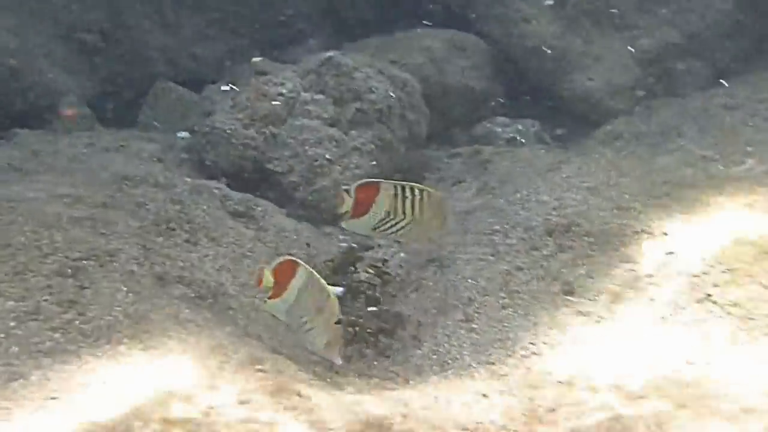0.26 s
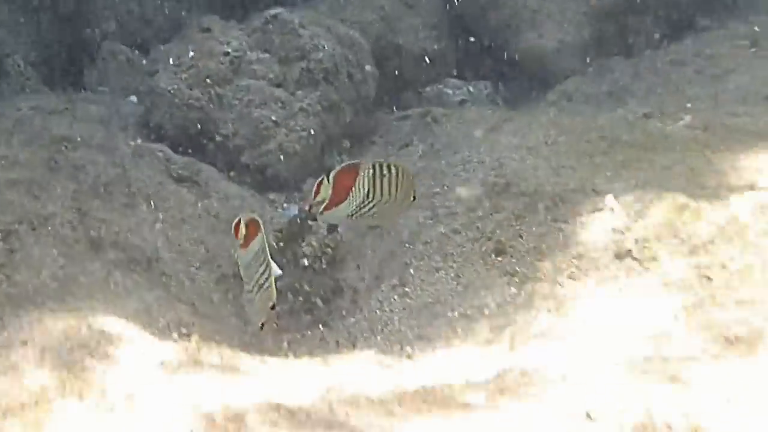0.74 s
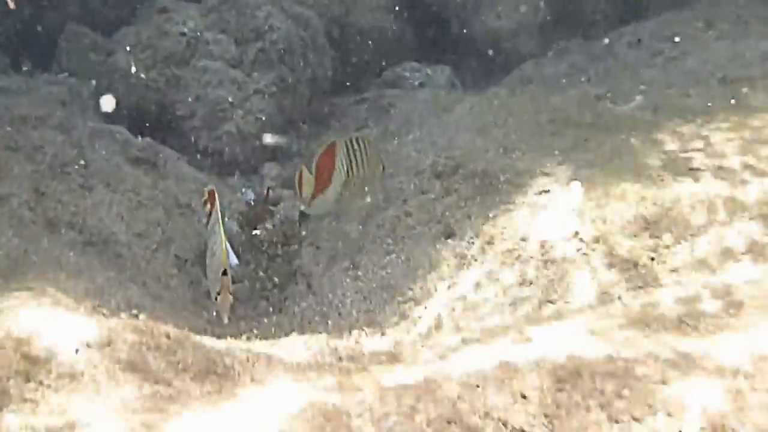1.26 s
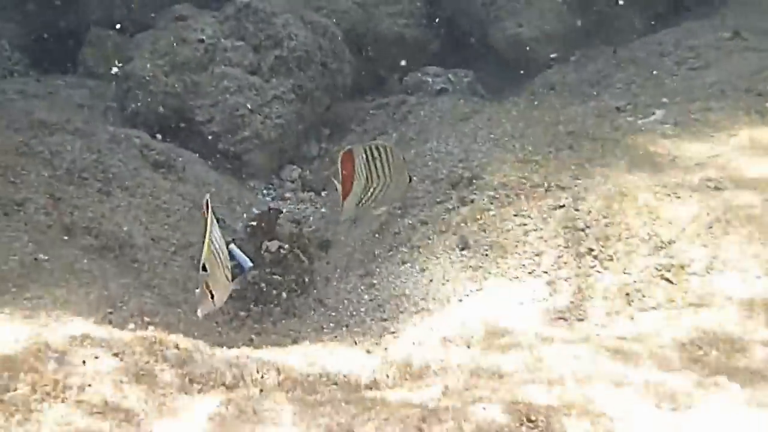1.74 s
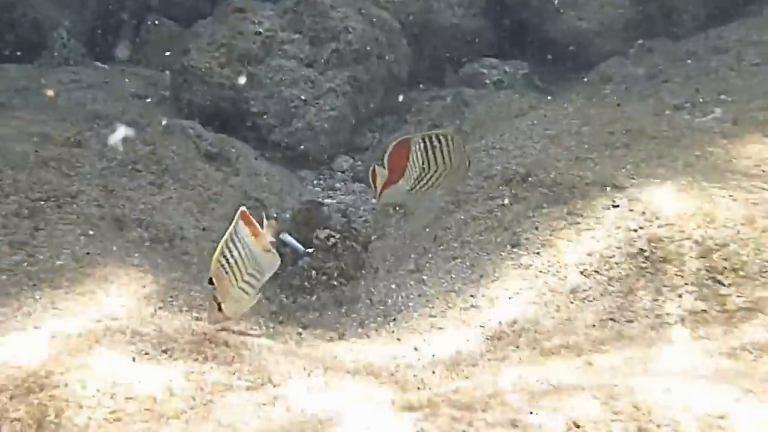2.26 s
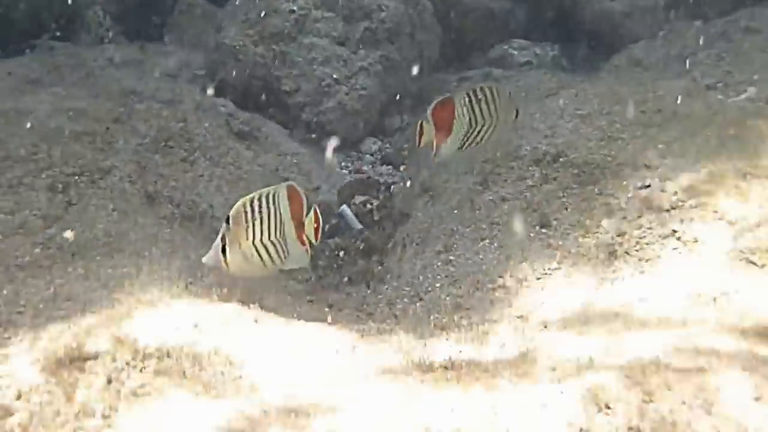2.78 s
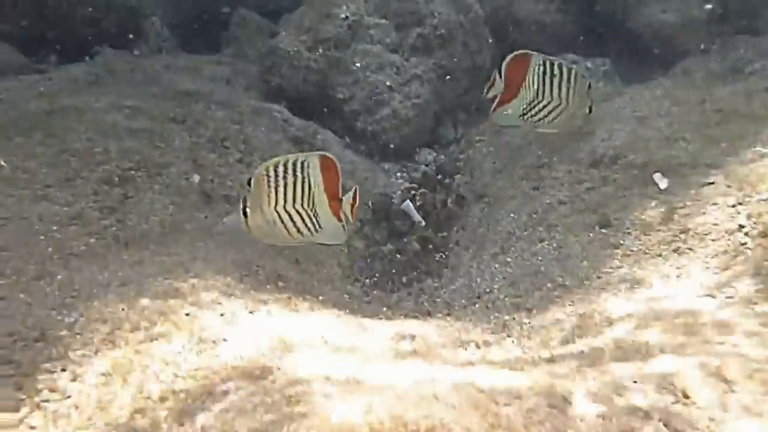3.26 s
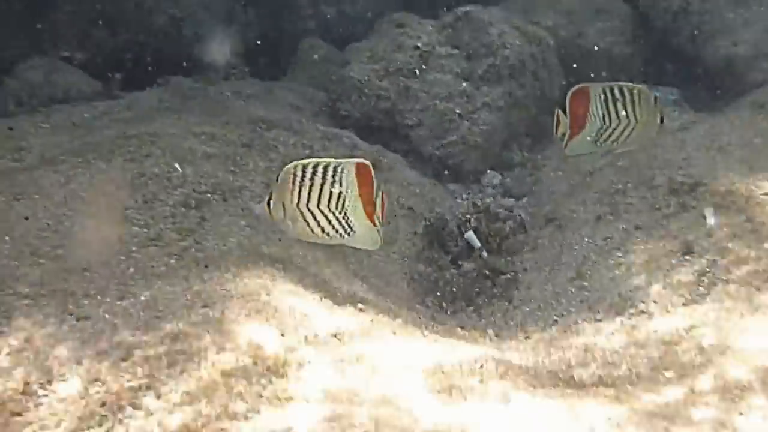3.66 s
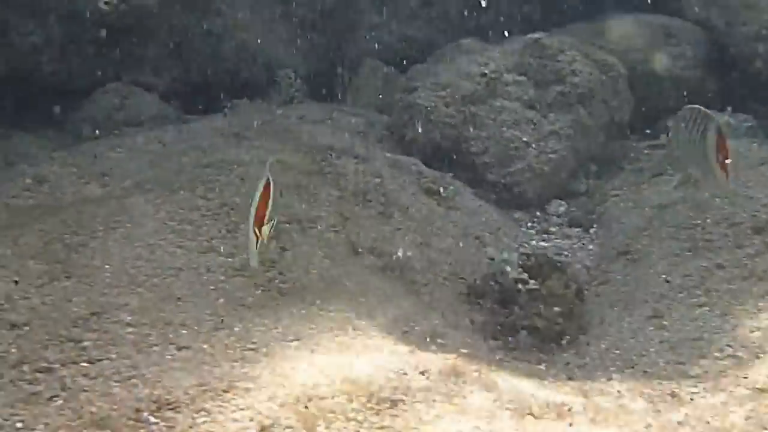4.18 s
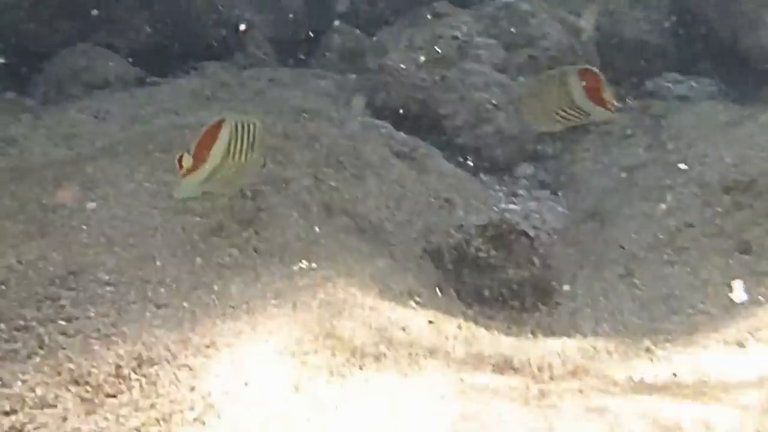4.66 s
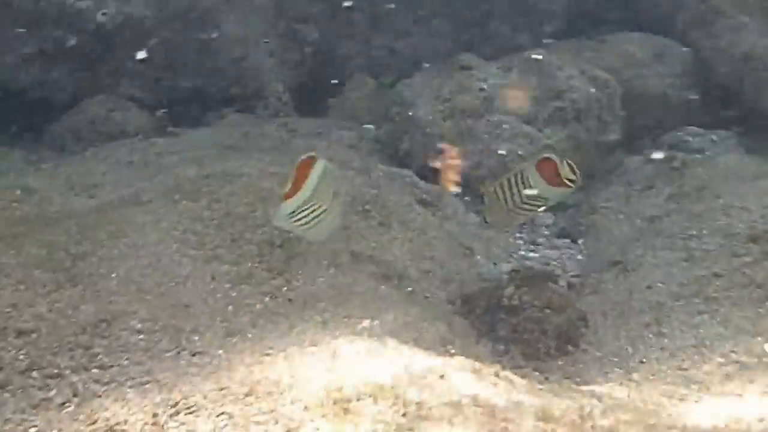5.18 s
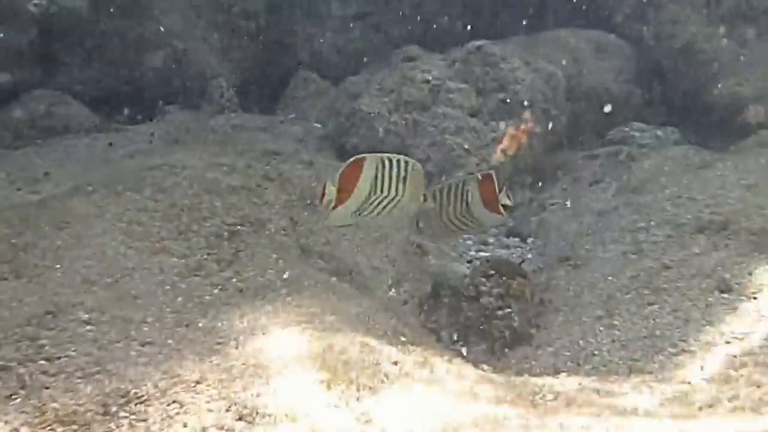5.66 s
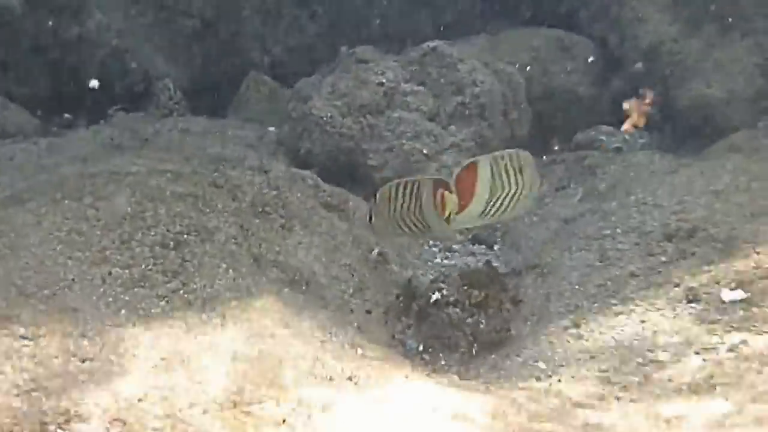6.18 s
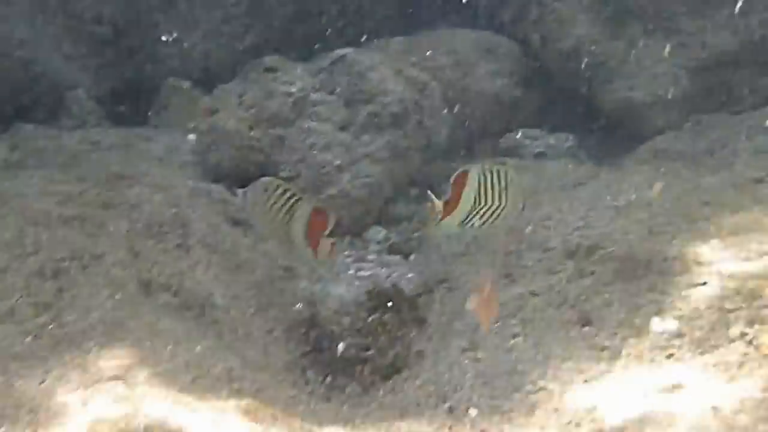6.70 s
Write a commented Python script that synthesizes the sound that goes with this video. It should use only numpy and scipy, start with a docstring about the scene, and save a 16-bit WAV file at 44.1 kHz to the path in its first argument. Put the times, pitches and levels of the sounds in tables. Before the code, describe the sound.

Heard underwater in the rocky shallows, a fine, steady crackle of bubbles and snapping animals surrounds a housed microphone. Bright pops and ticks land irregularly close by, while soft low thuds of water bump the housing. Small wavelets briefly thicken the crackle. Around three and a half seconds a breaking wavelet sends down a louder bubble rush that sinks in pitch, then the crackling continues over low gurgling wash and faint hiss.

```python
"""Under shallow water over rocks

The microphone sits in a camera housing held under water. Tiny bubbles and snapping animals crackle
all round, a few of them close by: ringing grains and noise bursts, each with short echoes.
A wavelet breaks overhead and its bubble cloud sinks in pitch, as a swarm with a moving lower edge.
Water slops against the housing in short, soft pressure pulses, over filtered-noise wash and hiss."""
import sys
import numpy as np
from scipy import signal
from scipy.fft import rfft, irfft
from scipy.io import wavfile
from scipy.ndimage import uniform_filter1d

SR = 44100
rng = np.random.default_rng(int(sys.argv[2]) if len(sys.argv) > 2 else 0)


def materialize(psi):
    """Save the field psi as 16-bit PCM at rate SR to the path in sys.argv[1].

    A 1-D psi becomes a single channel; in a 2-D psi each row is a channel.
    """
    bounded = np.clip(np.atleast_2d(psi).T, -1, 1)
    quanta = np.round(bounded * 32767).astype(np.int16)
    wavfile.write(sys.argv[1], SR, quanta)


N = 306054
TIME = np.arange(N) / SR

# Spectrum of the bubble crackle; shallow water carries little below about 1.5 kHz: pitch_hz, level_db
CLOUD_COLOUR = [(900, -28.5), (1350, -14), (1520, -8), (1640, -6.5), (1800, -3.5), (2000, 3), (2250, -2),
                (2700, 0.5), (3450, -1), (3850, -4), (4300, -14.5), (4900, -29), (7000, -58.5)]
# Steady crackle between wavelets: start_s, level_db
CRACKLE = [(0, -33), (1.1, -30.5), (1.37, -34.5), (1.5, -31), (2.45, -32.5), (3.05, -33), (3.25, -32),
           (4.1, -36.5), (4.42, -29.5), (4.65, -31.5), (5.0, -29), (5.35, -35), (5.85, -30.5),
           (6.15, -35.5), (6.4, -31), (6.94, -32.5)]
# Small wavelets that spill bubbles: start_s, length_s, level_db, pitch_hz at mid-length
WAVELETS = [(-.05, 0.43, -27, 2710), (0.836, 0.21, -32.5, 3380), (1.748, 0.38, -28, 2380),
            (6.434, 0.49, -30.5, 2140)]


def cloud(calm_hz=2870, sink_octaves=0.97, favour_db=5, favour_octaves=0.28, far_db=-7):
    """Near crackle over a distant blur; wavelets make it louder and pull the prevailing bubble pitch along."""
    crackle = swarm(1423, 4945, per_s=900, spread_db=4.5, ring_s=0.00066)
    blur = coloured(rng.standard_normal(N), [(600, -39), (1200, 6.0), (5000, 1.0), (8000, -16)])
    calm = gain_of(follow(CRACKLE, TIME)) * wavering(depth_db=-1, per_s=11)
    spills = [swell(s, length, db, crest=0.25) for s, length, db, _ in WAVELETS]
    level = surging(calm, spills)

    # the prevailing pitch is an average weighted by power
    weighted_hz = calm ** 2 * calm_hz * wavering(depth_db=-0.63, per_s=9)
    for spill, (s, length, _, hz) in zip(spills, WAVELETS):
        weighted_hz = weighted_hz + spill ** 2 * sinking(s, length, hz, sink_octaves)
    prevailing_hz = weighted_hz / level ** 2

    def field_db(hz, t):
        away = np.log2(hz / np.interp(t, TIME, prevailing_hz)) / favour_octaves
        return read(CLOUD_COLOUR, hz) + favour_db * np.exp(-away ** 2 / 2)

    return shaped(crackle + gain_of(far_db) * blur, field_db, patchy_db=2.54) * level


# The wavelet breaking overhead: start_s, level_db before a small trim, pitch_hz of the lower edge
BREAKER = [(3.31, -68, 3670), (3.371, -30, 3760), (3.6, -27, 2570), (3.73, -20.5, 2070), (3.86, -19, 1760),
           (4.001, -20.5, 1810), (4.07, -30.5, 1680), (4.24, -27.5, 1500), (4.359, -39, 1620)]
# Spectrum of its bubbles before the moving edge: pitch_hz, level_db
BREAKER_COLOUR = [(1000, -22), (1500, -0.5), (2700, 5.5), (3200, 0.5), (3800, -3.5), (4400, -23),
                  (5200, -31), (7000, -27)]


def breaker(below_db=85, above_db=4, trim_db=0.6, large_db=3, large_spread_db=3, large_ring_s=0.0021, count=36):
    """Mostly ever larger bubbles are trapped, so the rush's lower edge sinks; some large ones ring out singly."""
    rush = swarm(1354, 5330, per_s=2000, spread_db=3.5, ring_s=0.00071, count=30)

    def field_db(hz, t):
        octave = np.log2(hz / follow(BREAKER, t, axis=2))
        # steep slope (dB per octave) below the edge, gentle slope above
        slope_db = below_db * np.minimum(octave, 0) - above_db * np.maximum(octave, 0)
        return read(BREAKER_COLOUR, hz) + slope_db

    start, end = BREAKER[0][0], BREAKER[-1][0]
    out = shaped(rush, field_db, patchy_db=1.0) * gain_of(follow(BREAKER, TIME) + trim_db)
    out *= (TIME > start) & (TIME < end)
    for u, v, w in rng.random((count, 3)):
        s = start + u * (end - start)
        edge_hz = follow(BREAKER, s, axis=2)
        # single pitches lie between the edge and 3 kHz, all slightly lowered
        hz = edge_hz * (3000 / edge_hz) ** w * 0.96
        grain = peaked(scattered(bubble(hz, large_ring_s), echo_db=-8, decay_s=.005))
        db = follow(BREAKER, s) + large_db + large_spread_db * (2 * v - 3.5)
        add(out, s, gain_of(db) * grain)
    return out


# Pops close to the microphone: start_s, level_db, pitch_hz, ring_s, echo_db
POPS = [(0.0064, -11.5, 3320, 0.001, -1), (0.0877, -1.5, 2570, 0.0015, -11), (0.1396, -10, 2730, 0.0015, 0),
        (0.1598, -13, 2730, 0.002, -7), (0.1766, -21, 2370, 0.0015, -2), (0.2757, -11, 2675, 0.0028, -7),
        (0.339, -13, 2700, 0.002, -10), (0.536, -14, 3130, 0.0005, 7), (0.6492, -11.5, 2400, 0.00054, -5),
        (0.8714, -10, 3520, 0.0012, -3.5), (0.88, -21, 2680, 0.0023, -4), (0.9213, -20, 2650, 0.00084, -7),
        (1.0081, -6.5, 3420, 0.00065, -9), (1.6086, -13, 3310, 0.0014, -15),
        (1.728, -8.5, 3360, 0.003, -13), (1.794, -10, 3466, 0.0018, -1), (1.8126, -16.5, 2110, 0.0021, -15),
        (1.8902, -13, 2650, 0.0013, 0), (1.9081, -18, 2540, 0.0021, -9), (2.0638, -16, 1806, 0.0023, 0),
        (2.1137, -17, 1950, 0.0013, -8), (2.354, -15, 3120, 0.0016, -7), (2.5733, -4.5, 3270, 0.0014, -3),
        (2.782, -10, 3350, 0.0015, -5), (2.7932, -13.5, 1980, 0.00085, 0.5), (2.8, -8.5, 3420, 0.00091, -2),
        (2.9722, -14.5, 3250, 0.001, -2), (3.0552, -14, 3550, 0.0017, -9),
        (3.1596, -13, 2740, 0.0019, -3.5), (3.2253, -15.5, 3010, 0.0017, -6),
        (3.3055, -19.5, 2220, 0.0018, 4), (3.4513, -11, 3500, 0.0022, -11), (3.506, -13, 3120, 0.0015, -7),
        (3.5513, -6.5, 3450, 0.0015, -11), (3.6927, -8.5, 2380, 0.0013, -9), (3.706, -12, 2570, 0.0015, -7),
        (3.8507, -3.5, 2160, 0.00074, -6), (3.8584, -11.5, 2180, 0.00094, 4),
        (3.9813, -4.5, 2700, 0.0016, -9), (4.0018, -4, 1980, 0.0023, -15), (4.119, -9.5, 1620, 0.0015, 2),
        (4.1243, -6, 2670, 0.0027, -24), (4.1871, -6.5, 1730, 0.0021, -5),
        (4.2066, -5.5, 2800, 0.00083, -11), (4.225, -7.5, 3280, 0.0005, 0), (4.2967, -12, 2600, 0.0028, -6),
        (4.311, -12, 2730, 0.0015, -7), (4.7203, -15.5, 2670, 0.0011, -16),
        (4.7654, -10, 3200, 0.00077, -7.5), (4.8299, -15, 3290, 0.0015, -7),
        (4.9512, -15.5, 2110, 0.0027, -12), (5.0073, -13.5, 2730, 0.0026, -19),
        (5.036, -9, 3060, 0.00097, -11), (5.106, -17.5, 3020, 0.0026, -9), (5.1788, -15, 3490, 0.0015, -2),
        (5.2849, -13, 3420, 0.0011, -0.5), (5.461, -10, 2800, 0.0005, 12), (5.4815, -9, 3420, 0.0008, 1.5),
        (5.6074, -7.5, 3350, 0.00074, 0), (5.6986, -7.5, 3540, 0.0022, -14), (5.7099, -6, 3260, 0.0015, -8),
        (5.9257, -9.5, 2760, 0.0016, -7), (5.9434, -17, 2640, 0.0015, -11), (5.9896, -6, 3270, 0.0018, -10),
        (6.028, -12, 2570, 0.0022, -12), (6.039, -8.5, 3010, 0.0033, -3.5), (6.0445, -15, 2940, 0.0023, 0),
        (6.144, -14.5, 2370, 0.0022, -7), (6.2098, -13, 3010, 0.0017, -10), (6.3897, -14, 2780, 0.0013, -9),
        (6.4318, -17, 2530, 0.0023, -3), (6.4848, -14, 1980, 0.0013, -6), (6.5163, -6.5, 2100, 0.0013, 1),
        (6.5397, -14, 2600, 0.0013, -11), (6.6792, -11, 2600, 0.002, -10), (6.858, -11, 2800, 0.0016, -22)]


def pops(crack_db=-5.0, crack_share=1.96, crack_rise_s=0.000068, tick_db=-24, tick_decay_s=0.00046,
         faint_db=-23, faint_spread_db=6, count=30):
    """A close pop is a bright tick, a crack and a brief ring with echoes; fainter ones fall at random."""
    out, t = np.zeros(N), span(size=1024)
    faint = [(u * TIME[-1], faint_db + faint_spread_db * v, 2100 + 1450 * w, .0016, -7)
             for u, v, w in rng.random((count, 3))]
    for s, db, hz, ring_s, echo_db in list(POPS) + faint:
        burst = (1 - np.exp(-t / crack_rise_s)) * np.exp(-t / (crack_share * ring_s))
        crack = peaked(coloured(rng.standard_normal(len(t)), CLOUD_COLOUR) * burst)
        pop = bubble(hz, ring_s, glide=1.2) + gain_of(crack_db) * crack
        pop = scattered(pop, echo_db=echo_db, decay_s=0.0056)
        # large, low bubbles are duller
        pop = softened(pop, low_hz=1590, high_hz=min(4300, 1.59 * hz))
        tick = rng.standard_normal(len(t)) * np.exp(-t / tick_decay_s)
        tick = peaked(softened(tick, low_hz=3330, high_hz=7250))
        add(out, s, gain_of(db) * peaked(pop))
        add(out, s, gain_of(db + tick_db) * tick)
    return out


# Dry, wide-band snaps of shrimp: start_s, level_db relative to one another
SNAPS = [(0.085, -19), (2.2281, 0.5), (2.5726, -16), (4.6018, -3), (5.7244, -6)]


def snaps(decay_s=.0003, echo_db=-8):
    """A snapping claw gives one sharp spike that reaches far into the treble, then a duller echo."""
    out, t = np.zeros(N), span(size=256)
    for s, db in SNAPS:
        spike = evened(rng.standard_normal(len(t)) * np.exp(-t / decay_s))
        echo = softened(scattered(spike, echo_db=-1, decay_s=0.0047), low_hz=1800, high_hz=6000)
        add(out, s, gain_of(db) * spike)
        add(out, s + .003, gain_of(db + echo_db) * echo)
    colour = [(500, -41), (2000, -9), (4000, 5.5), (6000, -5.5), (8000, -8.0), (11000, -16), (15500, -30)]
    return gain_of(-60.5) * coloured(out, colour)


# Pings of very small bubbles: start_s, level_db before a small trim, pitch_hz
PINGS = [(1.0595, -29, 5300), (1.0966, -22.5, 6200), (1.6682, -25.5, 5830), (2.534, -30, 4630),
         (2.5739, -15, 4050), (3.1577, -23, 5170), (3.208, -26, 4500), (4.605, -21.5, 3860),
         (4.893, -25.5, 5040), (5.914, -26, 4600), (6.8014, -26, 4600)]


def pings(trim_db=-1):
    """Very small bubbles ring high and short."""
    out = np.zeros(N)
    for s, db, hz in PINGS:
        ping = scattered(bubble(hz, ring_s=0.00068), echo_db=-1.0, decay_s=0.0018)
        add(out, s, gain_of(db + trim_db) * peaked(softened(ping, low_hz=3760, high_hz=7300)))
    return out


# Slops against the housing: start_s of the pulse centre, level_db before filtering, pitch_hz before lowering
SLOPS = [(0.0287, -21, 222), (0.0439, -21.5, 274), (0.1385, -26.5, 267), (0.3091, -25.5, 326),
         (0.3478, -17.5, 227), (0.4212, -24, 221), (0.4926, -26, 280), (0.5455, -25, 198),
         (0.5667, -25, 243), (0.9717, -22.5, 317), (1.0254, -20.5, 298), (1.0424, -20.5, 277),
         (1.062, -18, 287), (1.2844, -7, 324), (1.871, -22.5, 194), (1.9187, -19, 241),
         (1.9846, -24.5, 194), (2.1228, -26, 181), (2.3453, -25.5, 218), (2.4881, -10, 483),
         (2.5111, -19, 164), (2.5746, -24.5, 312), (2.7394, -27.5, 201), (2.8304, -15.5, 222),
         (2.8772, -15, 262), (3.1238, -26, 192), (3.2293, -26.5, 172), (3.2996, -26.5, 238),
         (3.5024, -29.5, 182), (3.6824, -23.5, 253), (3.8177, -26, 257), (3.9068, -21, 272),
         (4.2537, -27, 238), (4.4534, -21, 244), (4.8356, -23, 225), (5.0043, -19.5, 276),
         (5.1945, -23.5, 207), (5.2181, -22.5, 270), (5.3866, -29.5, 205), (5.5143, -20.5, 279),
         (5.5392, -23, 342), (5.5534, -22, 275), (5.6674, -19.5, 274), (5.8293, -20, 327),
         (6.0211, -23.5, 173), (6.1019, -21.5, 265), (6.2705, -22, 178), (6.486, -26, 194),
         (6.709, -22, 229)]


def slops(lower=0.96, roundness=5.86, sharpening=4, edge_db=-16, edge_ratio=3.8,
          faint_db=-39, faint_spread_db=7, count=80):
    """Strong slops, sharper the harder they hit, with faint ones lapping unevenly between them."""
    out, half_s = np.zeros(N), span(size=2048).mean()
    faint = [((k + u) * TIME[-1] / count, faint_db + faint_spread_db * v, 115 + 170 * w)
             for k, (u, v, w) in enumerate(rng.random((count, 3)))]
    for s, db, hz in list(SLOPS) + faint:
        # the quickest slops swing a few times more
        swing = roundness * max(hz / 300, 1) ** 3 / (1 + sharpening * gain_of(db))
        push = slop(lower * hz, rng.uniform(-0.74, -.1), swing)
        # a hard push has a steep front
        push = push + gain_of(db + edge_db) * slop(edge_ratio * hz, lean=-.6, roundness=3)
        # water flows round the housing, so the slowest part of each push is lost
        push = signal.sosfilt(signal.butter(2, 0.25 * hz, "high", fs=SR, output="sos"), push)
        add(out, s - half_s, gain_of(db) * push)
    return out


def slop(hz, lean, roundness):
    """One push of water: a dip, a crest and a second dip in pressure; less round means a sharper crest."""
    t = span(size=2048)
    width_s = (2 * roundness + 1) / (2 * 2 * np.pi * hz)
    # lean is a phase in radians
    push = np.exp(1j * lean) / (1 - 1j * (t - t.mean()) / width_s) ** (roundness + 1)
    return push.real * signal.windows.hann(len(t))


# Spectrum of the finest bubbles: pitch_hz, level_db
FIZZ_COLOUR = [(2500, -35), (4200, 2), (5700, 1), (6750, -5.5), (7200, -18.5), (9500, -14.5), (11000, -22),
               (13000, -26), (15700, -27)]
# Spurts of the finest bubbles: start_s, length_s, level_db
SPURTS = [(0.072, 0.11, -48), (.93, .16, -49.5), (1.44, 0.11, -46), (3.089, 0.16, -45), (3.307, 0.3, -46.5),
          (3.63, 0.45, -45.5), (5.4, 0.55, -54)]


def fizz(calm_db=-54.5, far_db=-3.0):
    """The finest bubbles prickle above the crackle, now and then in a spurt."""
    prickle = swarm(3660, 11900, per_s=800, spread_db=5.0, ring_s=0.00027, count=30)
    prickle += gain_of(far_db) * rng.standard_normal(N)
    calm = gain_of(calm_db) * wavering(depth_db=2, per_s=12)
    level = surging(calm, [swell(*row) for row in SPURTS])
    return shaped(prickle, lambda hz, t: read(FIZZ_COLOUR, hz), patchy_db=-0.4) * level


# Spectrum of the low wash: pitch_hz, level_db
WASH_COLOUR = [(25, -33), (60, -12.5), (120, -12.5), (200, -5.5), (300, -1.5), (420, -6), (620, -7),
               (800, -6.5), (1080, -15), (1450, -10), (2500, -33), (5000, -38.5)]
# Eddies round the housing, for wash and murmur alike: start_s, length_s, wash level_db, murmur level_db
EDDIES = [(0.436, 0.19, -41, -54), (0.836, 0.22, -39.5, -65), (1.723, 0.34, -43, -44),
          (2.3, 0.25, -41.5, -55), (3.357, 0.17, -42.5, -41.5), (3.822, 0.22, -40, -42.5),
          (4.187, 0.21, -39, -65), (4.54, 0.31, -40.5, -44.5), (5.38, 0.45, -40.5, -41.5),
          (6.67, 0.26, -45, -47)]


def wash(calm_db=-43.5, far_db=5):
    """Water gurgles round the housing in low, uneven eddies of bubbles and noise."""
    gurgle = swarm(164.5, 1310, per_s=350, spread_db=2.0, ring_s=0.0014, count=16)
    gurgle += gain_of(far_db) * rng.standard_normal(N)
    # flat apart from the random clumps
    eddies = shaped(gurgle, lambda hz, t: np.zeros((len(hz), len(t))), patchy_db=1.53)
    calm = gain_of(calm_db) * wavering(depth_db=0.9, per_s=12)
    surges = [swell(s, length, db, crest=0.43) for s, length, db, _ in EDDIES]
    return coloured(eddies, WASH_COLOUR) * surging(calm, surges)


def murmur(calm_db=-53, hz=872, width_hz=135):
    """The eddies wake one hollow resonance in short gurgles, some of them very faint."""
    tone = resonate(resonate(rng.standard_normal(N), hz, width_hz), hz, width_hz)
    surges = [swell(s, length, db, crest=0.4) for s, length, _, db in EDDIES]
    return evened(tone * wavering(depth_db=4, per_s=19)) * surging(gain_of(calm_db), surges)


# Ringing of the water layer at its lowest mode: start_s, length_s, level_db, pitch_hz at mid-length
RINGINGS = [(0.197, 0.51, -39.5, 1687), (2.274, 0.63, -42, 1671), (3.802, 0.49, -32, 1652),
            (4.803, 1, -49.5, 1720), (6.42, .55, -48, 1735)]


def layer(width_hz=60, sink_octaves=0.097):
    """Between surface and sand a faint, fuzzy, broken tone lingers; it sinks as the water deepens."""
    out, noise, broken = np.zeros(N), rng.standard_normal(N), wavering(depth_db=6.0, per_s=18)
    for s, length, db, hz in RINGINGS:
        mode_hz = sinking(s, length, hz, sink_octaves)
        tone = resonate(resonate(noise, mode_hz, width_hz), mode_hz, width_hz)
        out += evened(tone * broken) * swell(s, length, db, crest=.45, fullness=.5)
    return out


# Spectrum of the background hiss: pitch_hz, level_db
HISS_COLOUR = [(20, -22.5), (1000, 3.5), (7000, -3.5), (10000, -9.5), (12500, -11), (15700, -22.5)]


def hiss(level_db=-57):
    """A faint, even hiss of filtered noise behind everything."""
    return gain_of(level_db) * coloured(rng.standard_normal(N), HISS_COLOUR)


def swarm(lo_hz, hi_hz, per_s, spread_db, ring_s, count=40):
    """Countless bubbles of many sizes, most of them faint, each size along its own echo path."""
    out = np.zeros(N)
    for hz in np.geomspace(lo_hz, hi_hz, count):
        chance, size = rng.random((2, N))
        at = np.flatnonzero(chance < per_s / count / SR)
        births = np.zeros(N)
        births[at] = gain_of(spread_db * np.minimum(-np.log(size[at] + 1e-9), 4))
        ring = bubble(hz, ring_s * rng.uniform(0.33, 1.88))
        grain = evened(scattered(ring, echo_db=1, decay_s=0.0047))
        out += np.sqrt(hz) * signal.oaconvolve(births, grain)[:N]
    return evened(out)


def bubble(hz, ring_s, glide=0.):
    """A bubble rings for a few cycles; a glide raises its pitch a little as it nears the surface."""
    t = span(size=1024)
    envelope = np.sqrt(t / ring_s) * np.exp(-t / ring_s)
    return peaked(envelope * np.sin(2 * np.pi * hz * t * (1 + glide * t)))


def scattered(x, echo_db, decay_s):
    """Surface, sand and rocks return a sound within milliseconds, as sparse random echoes."""
    t = span(size=2048)
    taps = rng.standard_normal(len(t)) * (rng.random(len(t)) < .1) * np.exp(-t / decay_s) * (t > .0008)
    taps *= gain_of(echo_db) / (np.linalg.norm(taps) + 1e-12)
    taps[0] = 1  # the direct sound
    return signal.oaconvolve(x, taps)


def softened(x, low_hz, high_hz):
    """Shallow water cuts the bass of a click and the housing wall its top."""
    band = [low_hz, min(high_hz, .45 * SR)]
    return signal.sosfilt(signal.butter(5, band, "band", fs=SR, output="sos"), x)


def resonate(x, hz, width_hz):
    """A resonance of gain 1 that follows the curve hz: shift down to zero, smooth, shift back."""
    turn = np.exp(2j * np.pi * np.cumsum(hz * np.ones(len(x))) / SR)
    r = np.exp(-np.pi * width_hz / SR)
    return 2 * (turn * signal.lfilter([1 - r], [1, -r], x / turn + 1e-18)).real


def shaped(x, field_db, patchy_db):
    """Filters by a moving spectrum, field_db(hz, s), to rms 1; bubbles come in clumps of like size."""
    hz, t, z = signal.stft(x, SR, nperseg=512, noverlap=384)
    shape = gain_of(field_db(hz[:, None] + 1, t))
    clumps = rng.standard_normal(z.shape)
    for _ in range(2):
        clumps = uniform_filter1d(uniform_filter1d(clumps, size=9, axis=1), size=13, axis=0)
    shape = shape / np.linalg.norm(shape, axis=0)
    shape = shape * gain_of(patchy_db * np.clip(evened(clumps), -2, 2))
    return evened(signal.istft(z * shape, SR, nperseg=512, noverlap=384)[1][:N])


def coloured(x, points):
    """Filters a sound by a fixed spectrum, to rms 1."""
    gain = gain_of(read(points, np.fft.rfftfreq(len(x), 1 / SR)))
    return evened(irfft(rfft(x) * gain, len(x)))


def wavering(depth_db, per_s):
    """A gain that swells and sags at random, with per_s turning points a second."""
    knots = np.arange(0, TIME[-1] + 1, 1 / per_s)
    drift = np.clip(rng.standard_normal(N)[:len(knots)], -2, 2)
    return gain_of(depth_db * np.interp(TIME, knots, drift))


def swell(start, length, db, crest=0.39, fullness=0.63):
    """The amplitude of one surge of water: it rises to a crest part-way through and ebbs."""
    u = np.clip((TIME - start) / length, 0, 1)
    phase = np.interp(u, [0, np.clip(crest, .05, .95), 1], [0, .5, 1])
    return gain_of(db) * np.maximum(np.sin(np.pi * phase), 0) ** fullness


def sinking(start, length, hz, octaves):
    """A pitch that sinks evenly over one surge, passing hz halfway."""
    return hz * 2 ** (octaves * (.5 - np.clip((TIME - start) / length, 0, 1)))


def surging(calm, swells):
    """A calm amplitude with surges on top, added in power."""
    return np.sqrt(calm ** 2 + sum(s ** 2 for s in swells))


def gain_of(db):
    """Decibels to amplitude."""
    return 10 ** (np.asarray(db) / 20)


def evened(x):
    """Scales to rms 1."""
    return x / np.sqrt(np.mean(x ** 2) + 1e-20)


def peaked(x):
    """Scales to peak 1."""
    return x / (abs(x).max() + 1e-12)


def read(points, hz):
    """Reads a spectrum on a log-frequency axis."""
    f, value = np.transpose(points)
    return np.interp(np.log(hz + 1), np.log(f + 1), value)


def follow(rows, t, axis=1):
    """Reads one column of a curve at the times t."""
    rows = np.asarray(rows)
    return np.interp(t, rows[:, 0], rows[:, axis])


def add(mix, s, sound):
    """Mixes a sound in at a time in seconds."""
    part = mix[max(round(s * SR), 0):][:len(sound)]
    part += sound[:len(part)]


def span(size):
    """A short time axis in seconds."""
    return np.arange(size) / SR


def scene():
    """The steady water and its single clicks and thumps, over a faint even hiss."""
    water = cloud() + breaker() + layer() + fizz() + wash() + murmur()
    close = pops() + pings() + snaps() + slops()
    return (water + close + hiss())[None]


# Narrow dips in the response of the camera's microphone: pitch_hz, width_hz
NOTCHES = [(2890, 104), (7850, 28), (11700, 1340)]


def record(dry, edge_hz=15780):
    """The camera's narrow dips, then its upper band limit."""
    for hz, width_hz in NOTCHES:
        dry = signal.lfilter(*signal.iirnotch(hz, hz / width_hz, SR), dry)
    lowpass = signal.firwin(1023, edge_hz, window=("kaiser", 9), fs=SR)
    return signal.oaconvolve(dry, lowpass[None], "same")


dry = scene()
out = record(dry)
materialize(out)
```